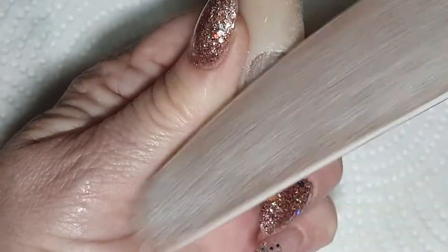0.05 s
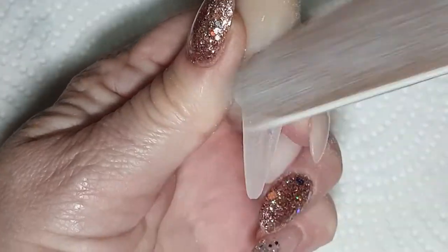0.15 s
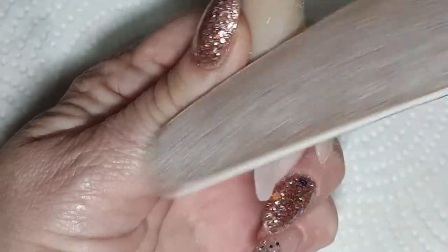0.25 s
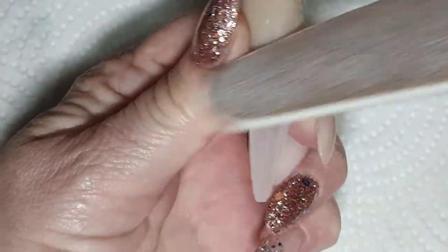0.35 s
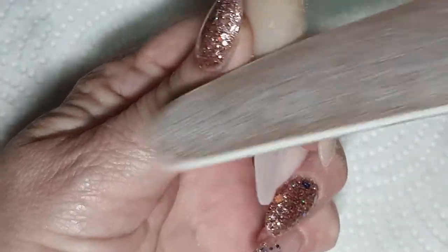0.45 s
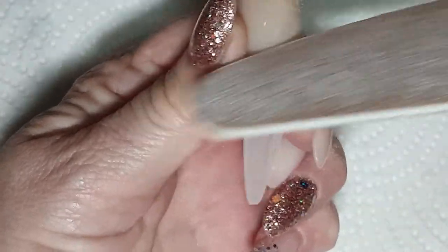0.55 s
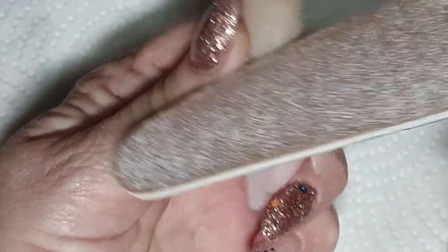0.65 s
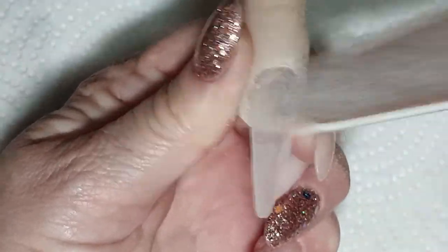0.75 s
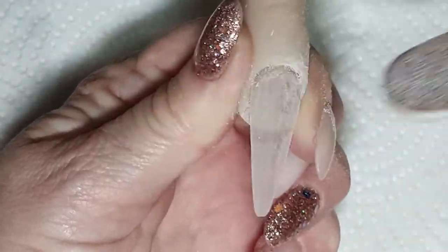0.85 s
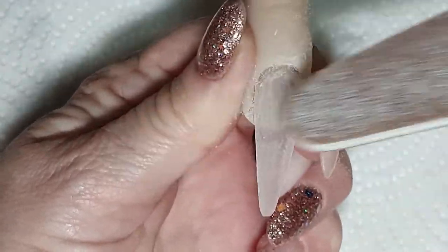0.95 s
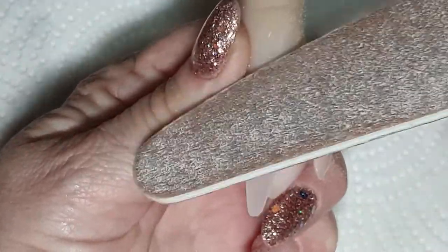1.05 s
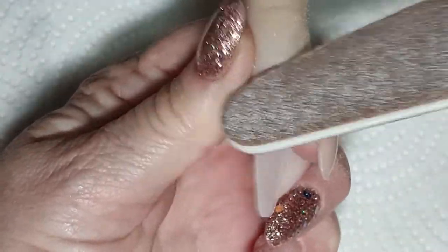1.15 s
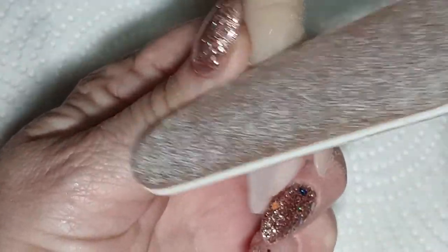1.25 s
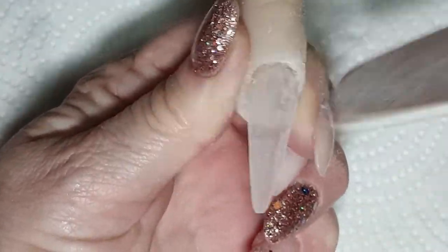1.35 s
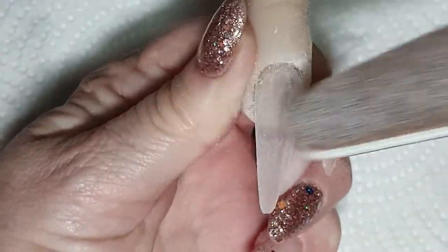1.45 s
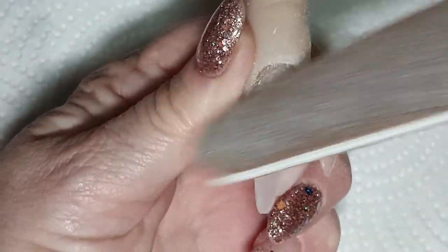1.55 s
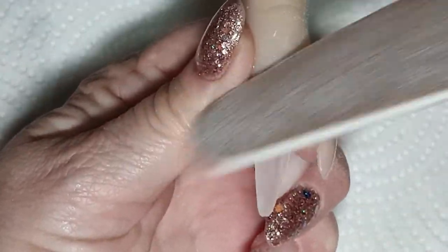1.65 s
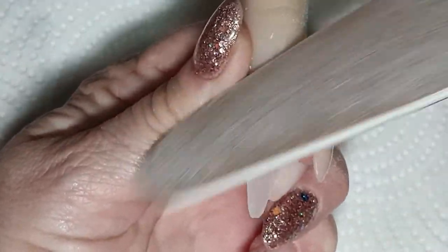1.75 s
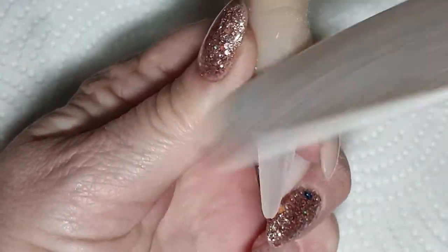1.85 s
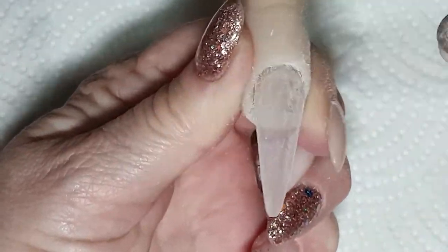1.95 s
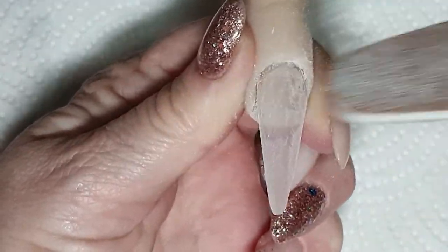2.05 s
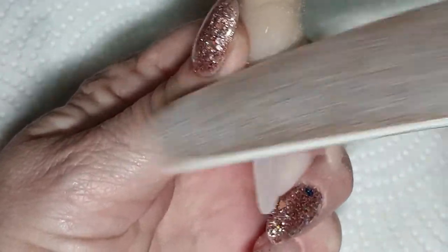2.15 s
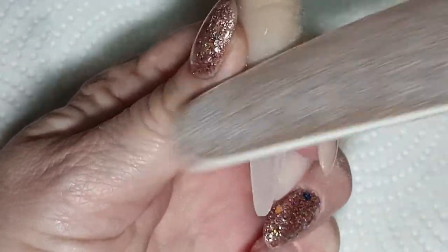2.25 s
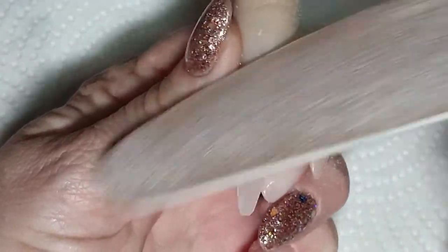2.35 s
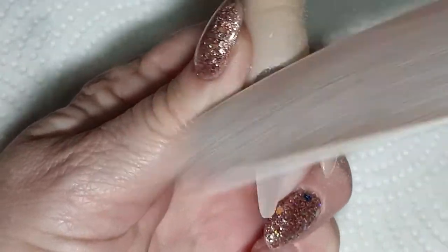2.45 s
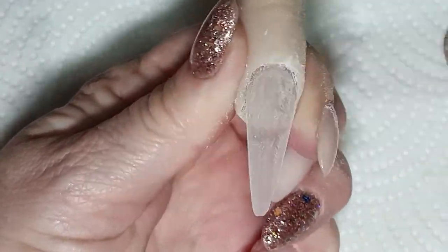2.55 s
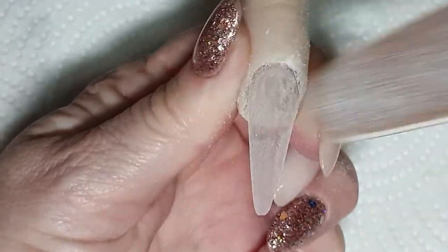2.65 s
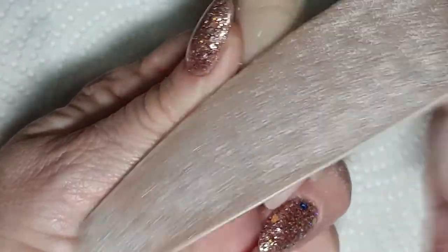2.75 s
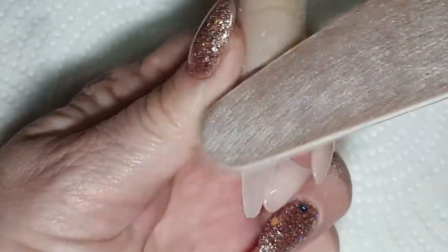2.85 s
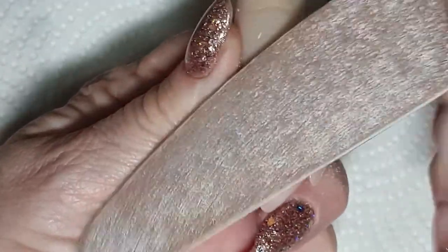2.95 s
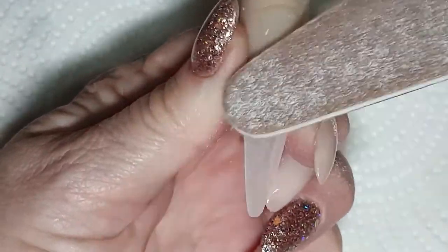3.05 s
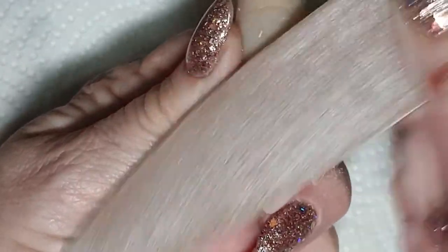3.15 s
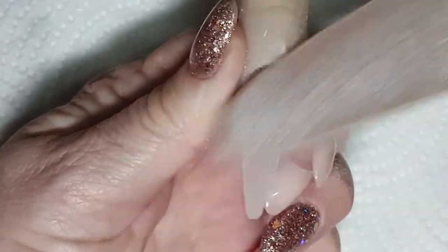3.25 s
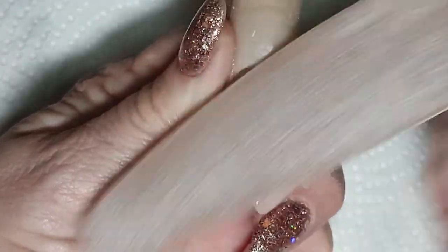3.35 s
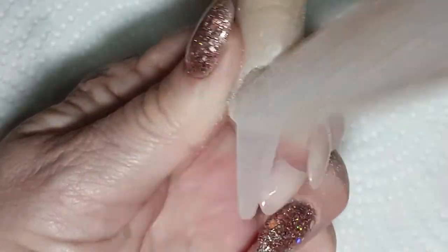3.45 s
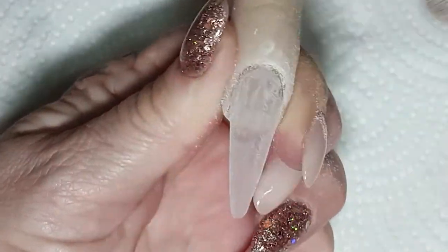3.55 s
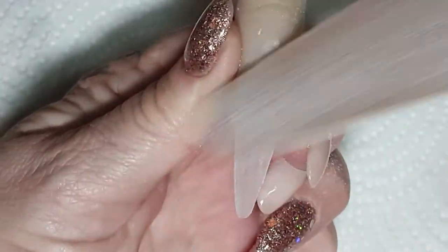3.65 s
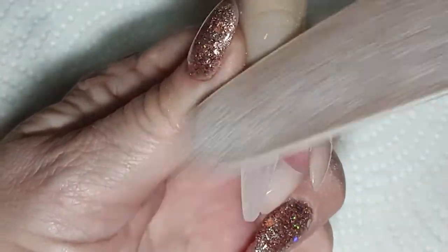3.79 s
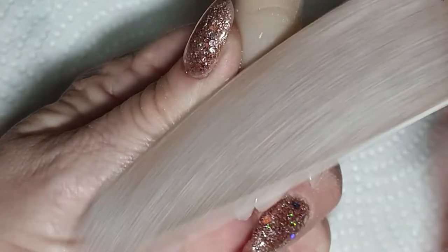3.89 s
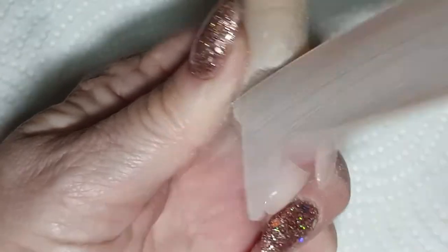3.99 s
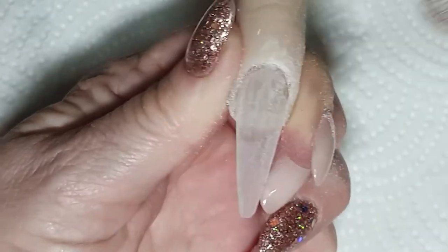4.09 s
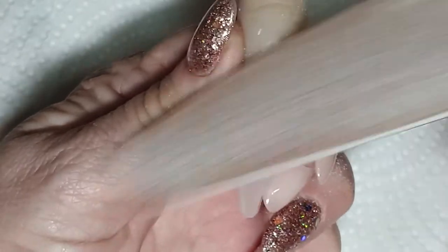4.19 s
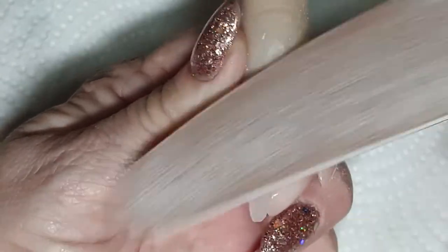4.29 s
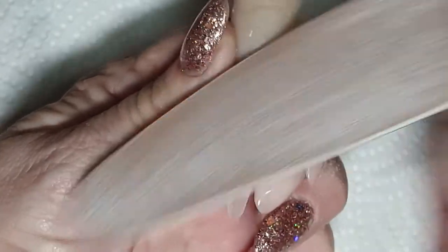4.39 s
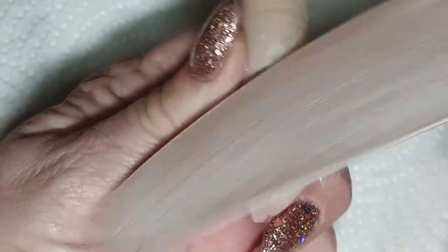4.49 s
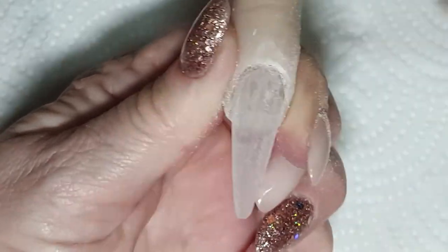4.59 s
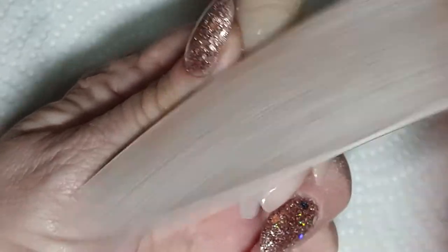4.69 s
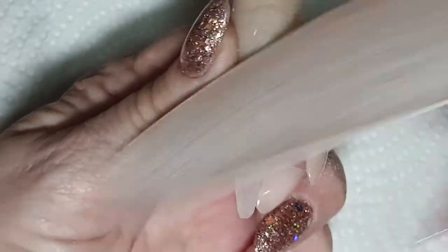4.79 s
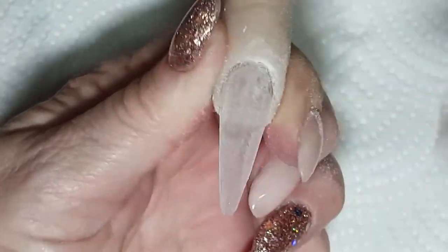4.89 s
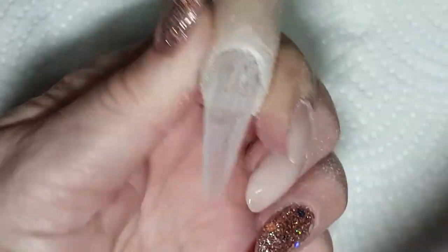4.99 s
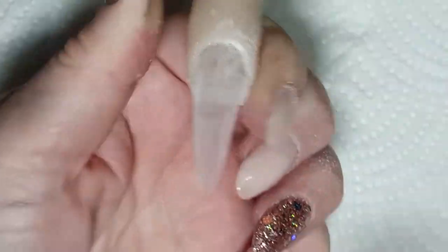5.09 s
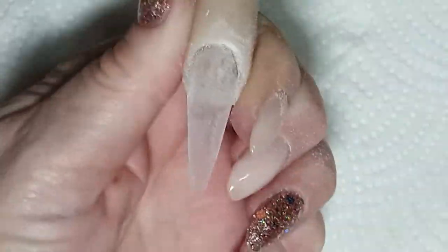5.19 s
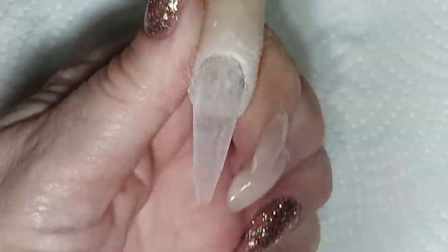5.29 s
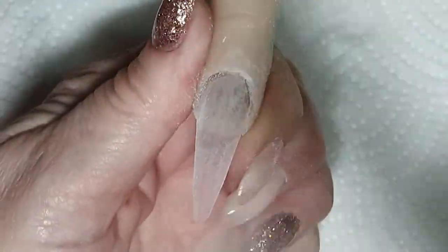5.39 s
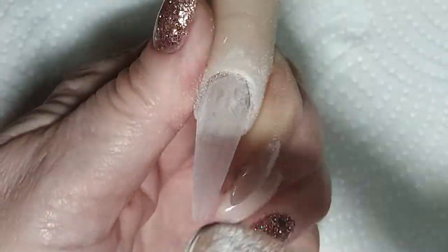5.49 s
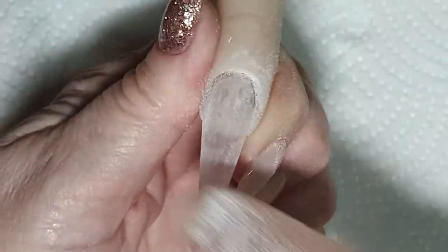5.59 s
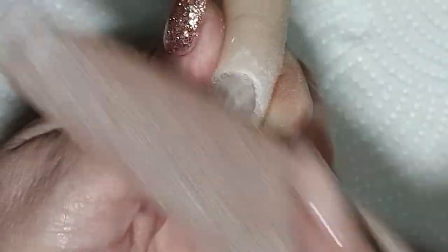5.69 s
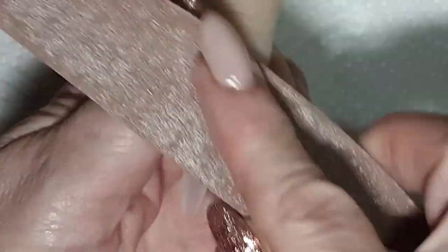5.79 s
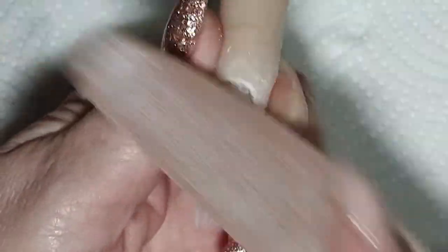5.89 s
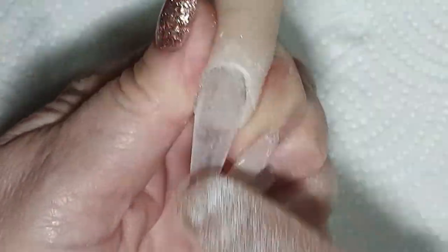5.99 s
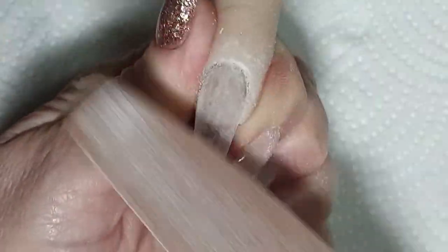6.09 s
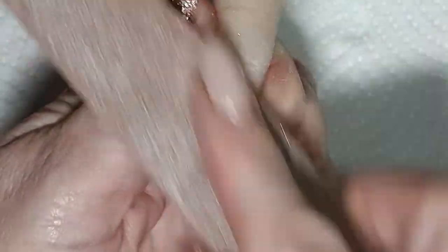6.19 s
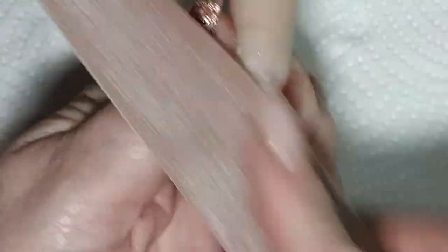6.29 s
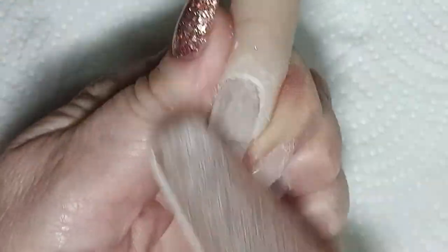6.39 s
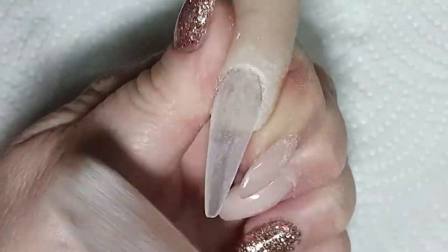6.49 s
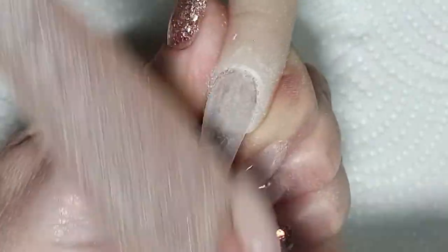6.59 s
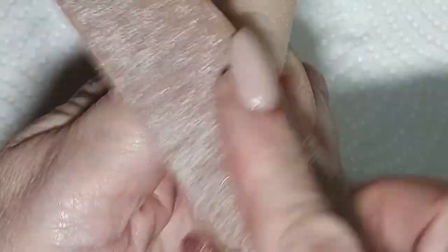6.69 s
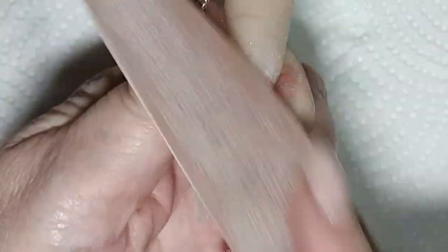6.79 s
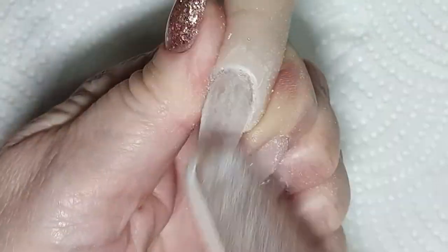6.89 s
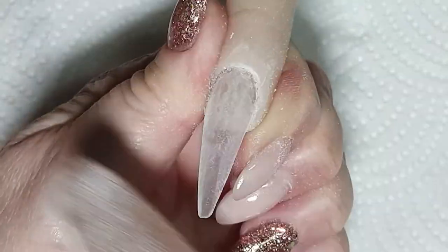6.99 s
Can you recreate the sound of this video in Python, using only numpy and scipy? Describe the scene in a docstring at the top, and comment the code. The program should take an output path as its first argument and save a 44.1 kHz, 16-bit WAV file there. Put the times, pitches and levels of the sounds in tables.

```python
"""Quick strokes of a coarse hand file rasp over a hard artificial nail, pull and push in turn, close to a phone.
Impacts of abrasive grains excite file, board and nail; the dragging board shakes the finger into a dull rub.
Short ticks, as the hands change grip or the file lands, are struck resonances of nails and file edge.
Soft bumps, hissing skin and a table rumble under the arms come from the hands.
A small room adds diffuse echoes, a faint drone and a hum."""
import sys
import numpy as np
from scipy import signal
from scipy.fft import rfft, irfft
from scipy.io import wavfile
from scipy.ndimage import uniform_filter1d, map_coordinates

SR = 44100
rng = np.random.default_rng(int(sys.argv[2]) if len(sys.argv) > 2 else 0)


def dump_mix(stems):
    """Bounce the given channels to the path in sys.argv[1] as a 16-bit WAV at rate SR."""
    frames = np.atleast_2d(stems).T  # one column per channel
    limited = np.clip(frames, -1, 1)  # hard clip at full scale
    pcm = np.round(limited * 32767).astype(np.int16)
    wavfile.write(sys.argv[1], SR, pcm)


N = 310464
TIME = np.arange(N) / SR


def undb(db):
    """Logarithmic level: decibels to amplitude gain."""
    return 10 ** (np.asarray(db) / 20)


def unit(x):
    """Power normalisation: scale to rms 1."""
    return x / np.sqrt(np.mean(x ** 2))


def steady(x, size):
    """Envelope flattening: divide by the running rms over size samples."""
    return x / np.sqrt(uniform_filter1d(x ** 2, size))


def colour(x, points):
    """Linear filtering: shape by a (Hz, dB) spectrum at unit mean power gain, so white noise keeps its power."""
    hz, db = np.transpose(points)
    log_f = np.log(np.fft.rfftfreq(N, 1 / SR) + 1)
    gain = undb(np.interp(log_f, np.log(hz), db, left=-90, right=-90))
    return irfft(rfft(x) * unit(gain), N)


def ring(x, modes):
    """Modal resonance: x drives damped modes, each filtered twice for steep skirts."""
    out = 0
    for hz, width, db in modes:
        b, a = signal.iirpeak(hz, hz / width, SR)
        once = signal.lfilter(b, a, x)
        out = out + undb(db) * signal.lfilter(b, a, once)
    return out


def walk(rate):
    """Random modulation: straight lines between normal values, rate of them a second, at rms 1."""
    knots = rng.standard_normal(N // 16)
    return unit(np.interp(TIME * rate, np.arange(len(knots)), knots))


def bend(x, ratio):
    """Resampling: a moving read-out speed shifts the resonances of a steady sound by a pitch ratio."""
    where = np.cumsum(ratio) % (N - 1)
    return np.array([map_coordinates(row, [where], order=3) for row in np.atleast_2d(x)])


def grit(speed, grains_per_s, spread):
    """Shot noise: random grain impacts of log-normal size, denser at speed but of even power."""
    share = np.clip(grains_per_s * (.2 + speed) / SR, .001, 1) * np.ones(N)
    hits = np.flatnonzero(rng.random(N) < share)
    size = np.exp(spread * rng.standard_normal(N)[hits])
    size = size * rng.choice([-1, 1], N)[hits]
    return unit(np.bincount(hits, size / np.sqrt(share[hits]), N))


def arc(s, rise_s, fall_s):
    """Kinematics: samples of one hand movement and its phase from 0 through .5 (fastest) to 1."""
    span = slice(max(int((s - rise_s) * SR), 0), int((s + fall_s) * SR))
    return span, np.interp(TIME[span], [s - rise_s, s, s + fall_s], [0, .5, 1])


def swells(events, power):
    """Energy addition: movements that speed up and come to rest add in power; returns their amplitude."""
    energy = np.zeros(N)
    for s, rise_s, fall_s, db in events:
        span, phase = arc(s, rise_s, fall_s)
        energy[span] += (undb(db) * np.abs(np.sin(np.pi * phase)) ** power) ** 2
    return np.sqrt(energy)


def ports(x):
    """Arrival-time difference: the sound reaches the left port 4 samples before the right."""
    return np.array([x, np.roll(x, 4)])


def tail(t60_s, damp_hz, onset_s):
    """Exponential decay: one ear's diffuse echo, of unit energy; the treble dies sooner."""
    t = TIME[:SR]
    noise = rng.standard_normal(SR)
    low = signal.sosfilt(signal.butter(2, min(damp_hz, SR / 2 - 1), fs=SR, output="sos"), noise)
    fade = np.exp(-np.log(1000) * t / t60_s)
    echo = (low * fade + (noise - low) * fade ** 1.35) * (1 - np.exp(-t / onset_s))
    return echo / np.linalg.norm(echo)


def room(pair, near_db, far_db):
    """Diffuse reflection: hands and table scatter at once, walls later; the paths sway as the hands move."""
    echoes = []
    for _ in range(2):
        near = tail(t60_s=0.036, damp_hz=10300, onset_s=0.00027)
        far = tail(t60_s=0.4, damp_hz=7900, onset_s=0.0053)
        echoes.append(undb(near_db) * near + undb(far_db) * far)
    wet = signal.fftconvolve(pair, echoes, axes=1)[:, :N]
    where = np.arange(N) + .00022 * SR * walk(14)  # rms sway of 0.22 ms
    wet = np.array([map_coordinates(row, [where], order=3) for row in wet])
    return (pair + wet) / np.sqrt(1 + undb(2 * near_db))


# relative spectrum of the air noise: frequency_hz, density_db
AIR_SPECTRUM = [(25, 12), (100, -18), (230, -3), (285, 12.5), (330, 1.5), (500, -8.5), (1000, -18.5),
                (4000, -25), (16000, -21.5)]
# steady hum of the room before the balance of the ports: frequency_hz, rms_level_db
HUM_TONES = [(60, -65), (109, -64), (169, -74)]


def air():
    """Stationary noise and tones: faint room drone, microphone hiss, and hum of slowly wandering phase."""
    mid, side = colour(rng.standard_normal((2, N)), AIR_SPECTRUM)
    noise = mid + .5 * side * np.array([[1], [-1]])
    hum = 0
    for hz, db in HUM_TONES:
        phase = 2 * np.pi * hz * TIME + 0.77 * walk(1.944)
        hum = hum + undb(db) * np.sqrt(2) * np.sin(phase)
    return undb(-65) * noise + hum * undb([[-3], [2]])


# an arm shifts its weight on the table: strongest_s, rise_s, fall_s, drive_db
ARM_LEANS = [(.2, .24, 0.15, -53), (.49, .15, 0.14, -47.5), (.98, .11, 0.18, -43),
             (1.91, 0.32, 0.24, -45.5), (2.23, 0.18, .1, -46), (2.56, 0.075, 0.074, -50),
             (2.88, 0.071, 0.21, -49.5), (3.52, 0.13, .12, -55), (3.86, 0.088, 0.065, -53),
             (4.29, 0.14, 0.12, -47), (5.74, .19, 0.13, -53.5), (6.42, 0.1, 0.08, -47),
             (6.93, 0.093, 0.16, -48.5)]
# relative spectra of the lower and upper table resonance: frequency_hz, density_db
BOOM_SPECTRUM = [(25, -11), (44, -70), (52, -23), (59, 17.5), (66, 3.5), (80, 0), (100, -31)]
THUD_SPECTRUM = [(70, -36), (92, -13), (109, -1), (128, 2), (148, -13), (168, -3), (190, -15.5),
                 (260, -14.5)]
LEAN_SWELL = 1.65  # exponent from speed to strength
REST_BOOM_DB, REST_THUD_DB = -65, -66  # tremor of the resting arms
LEAN_THUD_DB, FILING_THUD_DB, SLIDE_THUD_DB = -6, -6.5, -2.5  # coupling of each motion to the thud
ARM_LAG_S, ARM_SMEAR_S = 0.044, 0.11  # the drag of the file travels through the arms
TABLE_OWN_DB = -10.5  # part of the rumble that each port picks up alone


def table(drag):
    """Structure-borne sound: leaning arms swell two low resonances; the upper also follows the hands' work."""
    lean = swells(ARM_LEANS, LEAN_SWELL)
    smeared = np.abs(uniform_filter1d(drag ** 2, int(ARM_SMEAR_S * SR)))
    work = np.interp(TIME - ARM_LAG_S, TIME, smeared)
    skin = swells(SKIN_SLIDES, SLIDE_SWELL)
    boom = np.hypot(undb(REST_BOOM_DB), lean)
    thud = np.sqrt(undb(REST_THUD_DB) ** 2 + (undb(LEAN_THUD_DB) * lean) ** 2
                   + undb(FILING_THUD_DB) ** 2 * work + (undb(SLIDE_THUD_DB) * skin) ** 2)
    out = 0
    for strength, spectrum, sides_db in ((boom, BOOM_SPECTRUM, [[-3], [4]]),
                                         (thud, THUD_SPECTRUM, [[-2.5], [1.2]])):
        noise = colour(rng.standard_normal((3, N)), spectrum)
        common, left, right = steady(noise, size=SR // 30)
        shake = common + undb(TABLE_OWN_DB) * np.array([left, right])
        out = out + shake * strength * undb(sides_db)
    return out


# skin slides over skin as the finger is turned: strongest_s, rise_s, fall_s, drive_db
SKIN_SLIDES = [(4.13, .11, .11, -51), (5.06, 0.096, 0.14, -51), (5.22, 0.099, 0.15, -52),
               (5.37, 0.16, .12, -52.5), (5.48, 0.13, 0.13, -60.5)]
# relative spectrum of the sliding skin: frequency_hz, density_db
SKIN_SPECTRUM = [(150, -10), (300, 19.5), (700, 5.5), (1500, -4), (2600, 1), (4000, 5), (7000, 6.5),
                 (12000, 1), (16000, 6)]
SLIDE_SWELL = 1.02  # exponent from speed to strength


def slide():
    """Sliding friction: the soft hiss of skin, uneven in strength."""
    unevenness_db = 1.8 * walk(50)
    touch = swells(SKIN_SLIDES, SLIDE_SWELL) * undb(unevenness_db)
    common, left, right = rng.standard_normal((3, N))
    hiss = unit(ports(common) + np.array([left, right]))
    return room(colour(hiss * touch, SKIN_SPECTRUM), near_db=-9.5, far_db=-11.5)


# the padded edge of the file knocks against the finger: start_s, force_db
EDGE_BUMPS = [(.809, -16.5), (4.22, -14), (5.988, -13), (6.742, -13)]
# resonances of the padding: frequency_hz, width_hz (of one filter pass), gain_db
PAD_MODES = [(620, 400, -3), (1000, 450, 0), (2300, 1400, -8)]
PAD_PUSH_S = .0012  # decay time of the force


def bumps():
    """Cushioned impact: short noise bursts drive the damped modes of the padding."""
    force, t = np.zeros(N), TIME[:SR // 50]
    for s, db in EDGE_BUMPS:
        push = rng.standard_normal(len(t)) * np.exp(-t / PAD_PUSH_S)
        i = int(s * SR)
        force[i:i + len(t)] += undb(db) * push / np.linalg.norm(push)
    return room(ports(ring(force, PAD_MODES)), near_db=-8, far_db=-8)


# nails and file edge tick as the hands change grip or the file lands:
# start_s, snap_drive_db, knock_drive_db, scuff_decay_s
HARD_TICKS = [(4.8175, -21, -15, .0001), (4.9963, -10.5, -31, 0.0026), (5, -9, -14.5, 0.003),
              (5.003, -15, -25, .0004), (5.0185, -32, -15, 0.000096), (5.0336, -14, -12.5, 0.00011),
              (5.436, -36, -32, 0.0014), (5.847, -5.5, -5.5, 0.00012), (6.063, -18, -24, 0.0018),
              (6.0913, -17.5, -28, 0.00086)]
# resonances of the dull knock and the bright snap: frequency_hz, width_hz (of one filter pass), gain_db
KNOCK_MODES = [(2330, 470, -3.5), (4484, 1800, 0.5), (5270, 1100, -2)]
SNAP_MODES = [(7200, 2300, -7.5), (12500, 2600, 1), (13900, 2600, -7)]


def ticks():
    """Impulse response: a blow and its decaying scuff excite a bright snap and a knock of the nail."""
    snap, knock = np.zeros(N), np.zeros(N)
    t = TIME[:1024]
    for s, snap_db, knock_db, decay_s in HARD_TICKS:
        i = int(s * SR)
        scuff = 0.27 * rng.choice([-1, 1], len(t)) * np.exp(-t / decay_s) * (t > 0)
        push = (t == 0) + scuff
        snap[i:i + len(t)] += undb(snap_db) * push
        knock[i:i + len(t)] += undb(knock_db) * push
    sound = ring(snap, SNAP_MODES) + ring(knock, KNOCK_MODES)
    # straight in front of the phone: both ports alike
    return room(np.array([sound, sound]), near_db=-8, far_db=-5)


# one pass of the file, pull and push in turn within a run: fastest_s, speed_up_s, slow_down_s, rasp_drive_db
FILE_STROKES = [(0.031, 0.024, 0.043, -48.5), (0.132, .075, 0.046, -44.5), (.212, .027, .06, -35),
                (.331, 0.059, 0.048, -41), (.425, .052, 0.023, -41.5), (0.52, 0.048, 0.046, -45.5),
                (.615, 0.04, .055, -41.5), (.784, 0.074, 0.042, -38.5), (1.07, .045, .026, -39.5),
                (1.157, .043, .027, -39.5), (1.245, 0.046, 0.042, -42.5), (1.371, .07, .017, -37),
                (1.614, .08, 0.047, -47.5), (1.699, 0.047, .031, -43), (1.785, 0.051, 0.056, -39.5),
                (1.905, 0.071, 0.041, -37), (2.185, 0.034, 0.063, -46), (2.286, 0.046, 0.045, -46),
                (2.393, 0.059, 0.039, -39), (2.515, 0.076, 0.016, -33.5), (2.779, 0.079, 0.046, -37.5),
                (2.869, .055, 0.041, -35.5), (2.963, 0.056, 0.053, -33), (3.067, .057, 0.031, -32.5),
                (3.16, .048, 0.059, -32.5), (3.261, 0.042, 0.066, -30.5), (3.383, 0.059, 0.05, -32),
                (3.468, 0.039, 0.068, -30), (3.734, 0.061, .024, -38), (3.812, .05, .039, -34.5),
                (3.906, 0.045, 0.059, -36), (4.014, 0.058, .056, -32.5), (4.235, 0.047, 0.043, -38.5),
                (4.333, 0.057, 0.023, -37), (4.436, 0.062, 0.042, -37), (4.536, .055, 0.054, -33),
                (4.773, 0.045, 0.017, -37), (4.881, 0.097, 0.031, -32), (5.17, 0.062, 0.057, -35.5),
                (5.745, .07, 0.077, -37), (5.902, 0.075, 0.14, -35.5), (6.205, 0.052, 0.059, -42.5),
                (6.363, .092, 0.13, -39), (6.85, 0.1, .16, -38.5)]
# the file is set down at a new angle, which colours the strokes that follow: start_s, landing_scratch_db,
# fizz_db, board_db, finger_db (these three relative to the rasp, before effort and direction),
# hollow_tip_db (relative to the board), left_minus_right_db
STROKE_RUNS = [(.020, -42, -6.5, -10.5, -13.5, -30, 1.1), (1.03, -58, -8.5, -10, -10, -23, 2.3),
               (1.584, -47, -9.5, -9, -10.5, -16.5, 1), (2.177, -38.5, -9.5, -11, -13, -13, 1.5),
               (2.731, -40, -6, -9.5, -10, -30, 1.07), (3.693, -35, -4, -11.5, -12.5, -29, 0.79),
               (4.219, -39, -6.5, -9.5, -10.5, -13.5, 0.6), (4.744, -36.5, -2, -9.5, -13, -6.5, 0.2),
               (5.106, -75, -0.5, -8.5, -23, -16, -2), (5.668, -43, -7.5, -6.5, -8, -4, 0.5),
               (5.846, -39, -8.5, -8.5, -13.5, -3.5, 0), (6.159, -37.5, -8, -5.5, -13.5, -4.5, -1),
               (6.735, -60, -5.5, -9, -11.5, -7.5, -1)]
SWELL = 1.565  # exponent from speed to rasp
SETTLE_S = 0.0082  # the file takes this long to bed in as it lands
PUSH_FINGER_DB, PUSH_FIZZ_DB = 2, -0.14  # added on a push, taken off on a pull
USUAL_DB = -38  # rasp drive of zero effort
# change per dB of effort: a stronger stroke is brighter, with less of board and finger relative to the rasp
FIZZ_DB_PER_DB, BOARD_DB_PER_DB, FINGER_DB_PER_DB = 0.27, -0.42, -0.05


def hand():
    """Kinematics: speed and place of the file, drive of rasp, fizz, board, finger and nail tip, and side."""
    speed, place, drive = np.zeros(N), np.zeros(N), np.zeros((5, N))
    ends = [run[0] for run in STROKE_RUNS[1:]] + [np.inf]
    sides = []
    for (lands, _, fizz_db, board_db, finger_db, tip_db, pan_db), end in zip(STROKE_RUNS, ends):
        strokes = [row for row in FILE_STROKES if lands < row[0] < end]
        for k, (s, rise_s, fall_s, db) in enumerate(strokes):
            span, phase = arc(s, rise_s, fall_s)
            push = -1 if k % 2 == 0 else 1  # each run opens with a pull
            effort = db - USUAL_DB
            v = np.abs(np.sin(np.pi * phase))
            # no contact before the file lands, even if the hand already moves
            contact = v ** SWELL * np.clip((TIME[span] - lands) / SETTLE_S, 0, 1) ** 2
            speed[span] = v
            place[span] = -push * np.cos(np.pi * phase)
            # the top needs speed; the low parts sound as long as the file drags
            fizz = undb(fizz_db + FIZZ_DB_PER_DB * effort + PUSH_FIZZ_DB * push) * contact ** 0.97
            board = undb(board_db + BOARD_DB_PER_DB * effort) * contact ** 0.53
            finger = undb(finger_db + FINGER_DB_PER_DB * effort + PUSH_FINGER_DB * push) * contact ** 0.26
            tip = undb(tip_db) * board
            drive[:, span] += undb(db) * np.array([contact, fizz, board, finger, tip])
            sides.append((s, pan_db))
    return speed, place, drive, np.interp(TIME, *np.transpose(sides))


# relative spectra of the finger's shudder and the hollow nail tip: frequency_hz, density_db
FINGER_SPECTRUM = [(90, -11), (170, -17), (240, -4.5), (295, 1.5), (340, -4.5), (410, -7), (490, -14.5),
                   (580, -30), (900, -32.5)]
TIP_SPECTRUM = [(130, -6), (170, 5), (240, 6.5), (320, 8.5), (450, 8), (700, -1), (1200, -2), (1800, -2),
                (2600, -16)]
# the finger's dull resonance sinks overall as the grip loosens: time_s, pitch_hz
GRIP_PITCH = [(0, 343.5), (.7, 335.8), (1.2, 299), (2.4, 302.2), (3.5, 283.2), (7.0, 275.5)]
FINGER_HZ = 295  # peak of the finger spectrum
# standing waves of the room, set ringing by the dull rub: frequency_hz, width_hz (of one filter pass), gain_db
STANDING_WAVES = [(170, 10, 11), (294.2, 22, -3.5)]


def rubbing(speed, finger, hollow):
    """Forced vibration: finger and nail tip shake as a whole and set the room's standing waves ringing."""
    pitch_hz = np.interp(TIME, *np.transpose(GRIP_PITCH))
    noise = colour(rng.standard_normal(N), FINGER_SPECTRUM)
    shudder = bend(noise, pitch_hz / FINGER_HZ)[0]
    # the finger shudders at a nearly even strength for as long as the file drags
    rub = steady(shudder, size=SR // 30) * finger
    tip = colour(grit(speed, grains_per_s=2500, spread=0.31), TIP_SPECTRUM) * hollow
    body = ports(undb(1.03) * rub + undb(1.0) * tip) * undb([[-1.0], [1.0]])
    dull = room(body, near_db=-15, far_db=-12)
    return undb(-1.0) * (dull + ring(dull, STANDING_WAVES))


def touchdown():
    """Transient contact: many grains bite at once as the file lands, then the scratch decays."""
    scratch, t = np.zeros(N), TIME[:SR // 10]
    for s, scratch_db, *_ in STROKE_RUNS:
        i = int(s * SR)
        scratch[i:i + len(t)] += undb(scratch_db) * np.exp(-t / 0.013)
    return scratch


def abrasion(speed, place, shared):
    """Stick-slip and comb filtering: bunched grain impacts meet their echo from the end of the file."""
    common, left, right = (grit(speed, grains_per_s=16000, spread=0.27) for _ in range(3))
    # each port hears a common part and its own side of the file
    grains = np.sqrt(shared) * ports(common) + np.sqrt(1 - shared) * np.array([left, right])
    # catching and slipping bunches the impacts
    grains = grains * undb(1.7 * walk(900) + .8 * walk(110))
    # the returning wave sweeps a comb as the contact travels
    lag_s = 0.0008096 * (1 + .25 * place + 0.16 * walk(3))
    where = np.arange(N) - lag_s * SR
    back = np.array([map_coordinates(g, [where], order=3) for g in grains])
    return unit(grains + 0.41 * back)


# relative spectra of rasp, fizz and ringing board: frequency_hz, density_db
RASP_SPECTRUM = [(2500, -17), (4000, -19), (4700, -2.5), (5400, -5), (6100, 0.5), (7000, -1.2), (8300, -2),
                 (9600, -3.5), (11500, -24), (15000, -34)]
FIZZ_SPECTRUM = [(7500, -3.5), (9500, -6.5), (11000, -2.5), (13000, -3.5), (14200, -5), (16000, -9)]
BOARD_SPECTRUM = [(500, -35), (700, -6.5), (850, -11.5), (1140, -7), (1500, -10.5), (1900, -4.5),
                  (2300, -1), (2700, 0), (3000, -3), (3300, -0.5), (3900, -4), (5500, -4)]


def scraping(speed, place, rasp, fizz, board):
    """Resonant excitation: the grain impacts sound through nail and board, with pitch led by speed."""
    grains = abrasion(speed, place, shared=0.46)
    scratch = touchdown()
    # the rasp rises with speed; the board's ringing drifts as its overhang changes
    overhang = walk(9)
    scrape = bend(colour(grains, RASP_SPECTRUM), .95 + .07 * speed + .03 * overhang)
    scrape = scrape * (rasp + 0.45 * scratch)
    sparkle = colour(grains, FIZZ_SPECTRUM) * (fizz + 0.53 * scratch)
    wood = bend(colour(grains, BOARD_SPECTRUM), 1 + .025 * overhang) * board
    mix = undb(0.33) * scrape + undb(1.6) * sparkle + undb(0.1) * wood
    return room(mix, near_db=1.5, far_db=-3)


def filing(speed, place, drive, pan_db):
    """Superposition: the bright scraping, panned by level difference, adds to the dull rub."""
    rasp, fizz, board, finger, hollow = drive
    bright = scraping(speed, place, rasp, fizz, board)
    dull = rubbing(speed, finger, hollow)
    return bright * undb(np.array([pan_db, -pan_db]) / 2) + dull


def scene():
    """Superposition: all sources add at the two microphone ports."""
    speed, place, drive, pan_db = hand()
    finger, tip = drive[-2:]
    background = air() + table(np.hypot(finger, tip))
    handling = slide() + bumps() + ticks()
    return background + handling + filing(speed, place, drive, pan_db)


def record(dry):
    """Low-pass filtering: the phone cuts the top above 15.9 kHz."""
    return signal.sosfilt(signal.ellip(10, .2, 70, 15900, fs=SR, output="sos"), dry)


dry = scene()
out = record(dry)
dump_mix(out)
```